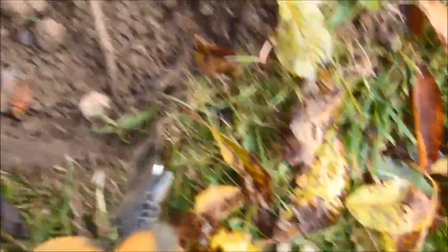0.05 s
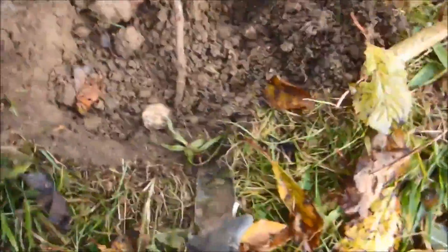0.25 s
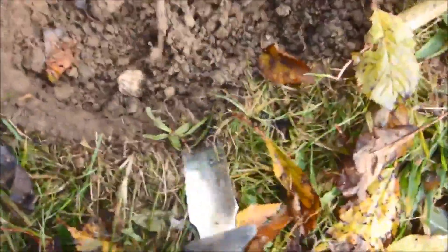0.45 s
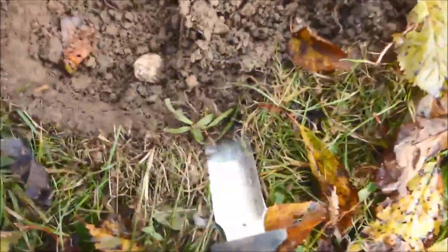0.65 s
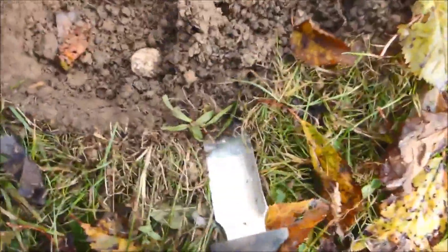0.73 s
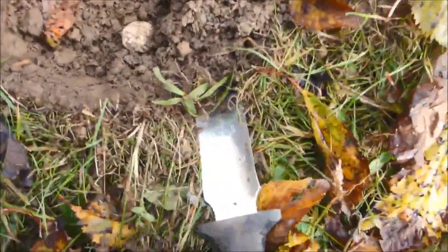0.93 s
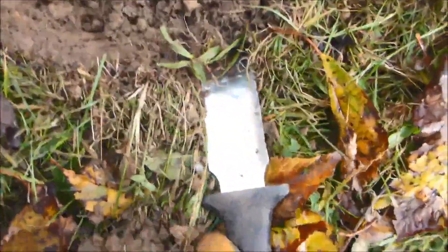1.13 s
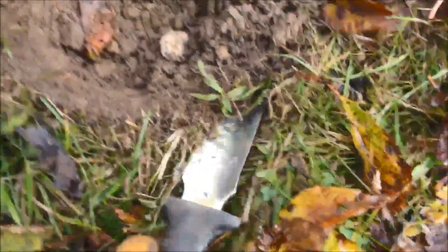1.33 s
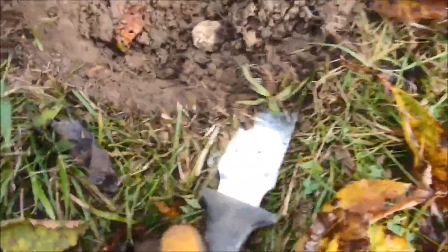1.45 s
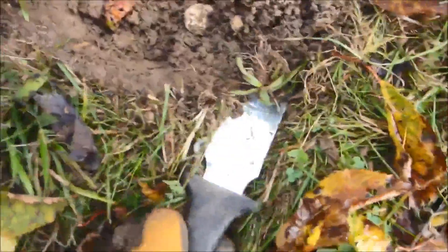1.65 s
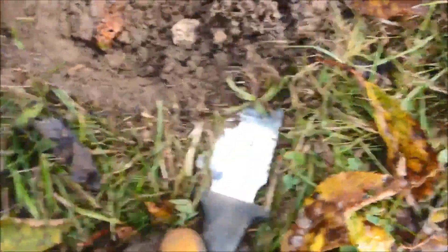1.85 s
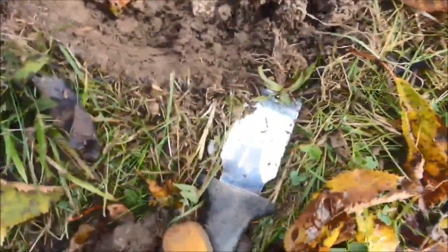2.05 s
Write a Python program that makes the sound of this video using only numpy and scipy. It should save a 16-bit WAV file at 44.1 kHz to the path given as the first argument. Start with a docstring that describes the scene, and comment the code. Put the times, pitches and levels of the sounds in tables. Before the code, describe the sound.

A steel digging knife knocks and clacks in soil amid softly rustling grass.

```python
"""A steel digging knife works through grass and dry leaves at the edge of a hole, close up.
One dull knock in the soil with a gritty scrape, then two sharp clacks of the damped steel, the second
with a thud under it, then light ticks of stems and crumbs. Grass rustles and swishes over the moving
blade, and handling friction adds a hollow rubbing tone and brief squeaks.
A thin ring flutters on the right, over a bed of quiet outdoor air."""
import sys
import numpy as np
from scipy import signal
from scipy.fft import rfft, irfft
from scipy.io import wavfile
from scipy.ndimage import map_coordinates

SR = 44100
rng = np.random.default_rng(int(sys.argv[2]) if len(sys.argv) > 2 else 0)


def master_out(mix):
    """Clip the mix to full scale and print it as 16-bit PCM to the path in sys.argv[1]."""
    frames = np.transpose(np.atleast_2d(mix))
    ceiling = np.clip(frames, -1, 1)
    pcm = np.round(ceiling * 32767).astype(np.int16)
    wavfile.write(sys.argv[1], SR, pcm)


N = 92610
T = np.arange(N) / SR
FREQS = np.fft.rfftfreq(N, 1 / SR) + 1e-3

# EQ of the air bed, mid and side: f/Hz, gain/dB
AIR_MID_EQ = [(25, -5.5), (70, -4.5), (150, 2.5), (300, 4), (800, 4), (1400, 2.5), (1800, 8), (2500, -6),
              (4000, -20.5), (6000, -3), (7800, -5.5), (10000, -20.5), (13000, -25), (15000, -20)]
AIR_SIDE_EQ = [(25, -14), (150, -7.5), (700, 2.5), (1600, 4.5), (2150, 13.5), (2900, -6), (7500, -8),
               (10000, -26.5), (15000, -27)]
# swells of the thin ring: centre t/s, length/s, level before trim/dB
THIN_RING_SWELLS = [(0.027, 0.074, -47.5), (0.13, 0.08, -47.5), (0.207, 0.051, -50), (0.29, 0.043, -46.5),
                    (0.338, 0.048, -48.5), (0.42, 0.032, -40.5), (.475, .05, -45), (0.701, 0.037, -41.5),
                    (0.771, 0.022, -44), (0.839, 0.02, -49), (0.891, 0.039, -48), (0.99, 0.018, -45.5),
                    (1.1, .05, -50), (1.256, 0.034, -43.5), (1.336, 0.038, -44), (1.41, 0.085, -54),
                    (1.584, 0.061, -44.5), (1.697, 0.089, -47.5), (1.82, 0.026, -43.5), (1.915, 0.075, -40),
                    (2.014, 0.044, -44.5), (2.078, 0.024, -44)]
# envelope of the hollow rub: t/s, level/dB
RUB_ENVELOPE = [(0, -60), (.15, -53.5), (.33, -49), (.48, -54.5), (.54, -65), (.6, -82), (.67, -55),
                (.86, -58.5), (1.02, -66), (1.19, -59.5), (1.29, -70), (1.42, -55), (1.53, -53),
                (1.59, -53), (1.7, -53.5), (1.76, -68.5), (1.84, -84), (1.88, -56.5), (1.935, -59),
                (1.96, -58), (2.1, -53.5)]
# handling squeaks: centre t/s, length/s, level/dB, f/Hz, glide/(octaves per s)
SQUEAK_CUES = [(1.528, .05, -50.5, 598.6, 7), (1.566, 0.019, -59, 1024, 19), (1.621, 0.021, -53, 1570, 1.5),
               (1.931, 0.011, -47.5, 687, -2), (1.982, 0.0094, -46.5, 704, -1.5)]
# envelope of the grass rustle: t/s, level/dB
RUSTLE_ENVELOPE = [(0, -53), (.09, -50.5), (.13, -48), (.19, -51.5), (.28, -50.5), (.44, -54), (.54, -58),
                   (.63, -64.5), (.68, -61.5), (.78, -58), (.88, -67), (1.0, -60), (1.15, -66), (1.21, -55),
                   (1.275, -66), (1.36, -56), (1.41, -51), (1.5, -53.5), (1.565, -47), (1.61, -54.5),
                   (1.69, -56.5), (1.77, -62), (1.83, -56.5), (1.94, -51), (2.02, -58.5), (2.1, -55)]
# EQ of the rustle, mid and side: f/Hz, gain/dB
RUSTLE_MID_EQ = [(40, -30), (90, -14), (170, -4), (280, 5), (420, 3), (800, 10), (1300, 2.5), (1800, 3),
                 (2600, 1.5), (5000, -2), (6800, -8), (8500, -17.5), (10500, -29.5), (13200, -37),
                 (14800, -20.5), (16000, -50)]
RUSTLE_SIDE_EQ = [(40, -60), (200, -16), (800, -13), (1500, -17), (2150, 1), (2900, -5), (5000, -7.5),
                  (7000, -11.5), (10000, -82), (15000, -50)]
# swishes of grass along the blade: centre t/s, length/s, level/dB
SWISH_CUES = [(0.133, 0.03, -54.5), (1.442, 0.049, -49.5), (1.563, 0.03, -51), (1.637, 0.0052, -56)]
# EQ of a swish: f/Hz, gain/dB
SWISH_EQ = [(500, -18), (1500, -4), (2600, -1), (5500, 0.5), (7500, -17), (10500, -34), (13000, -39),
            (14600, -17), (16000, -30)]
# envelope of the blade dragging along the ground: t/s, level/dB
SCRAPE_ENVELOPE = [(1.33, -79), (1.43, -50), (1.58, -54), (1.68, -57.5), (1.77, -73)]
# resonances of the dragged blade: f/Hz, width/Hz, relative level/dB
SCRAPE_RESONANCES = [(1807, 240, -13.5), (3744, 220, -12), (5250, 240, -12)]
# stems and crumbs snapping: t/s, level before EQ/dB, pan left/dB, relative tail level/dB, tail t60/s
TICK_CUES = [(.7683, -37, 6, -11, .007), (.788, -33.5, .5, -11, .007), (.8296, -33, 0, -11, .007),
             (.9555, -41, 0, -11, .007), (1.074, -39, 0, -11, .007), (1.1708, -27, 3, -11, .007),
             (1.421, -34, 1, -11, .007), (1.637, -38, .5, -7, .03), (1.64, -33, .5, -9, .012),
             (1.715, -41, 7, -9, .012)]
# EQ of a tick: f/Hz, gain/dB
TICK_EQ = [(150, -33), (600, -14), (2000, -7), (3000, -10), (4200, 0), (7000, 1), (9000, -7), (11000, -19),
           (16000, -16)]
# grit hitting the blade: t/s, level/dB, pitch/ratio to the grit's modes
GRIT_CUES = [(.2393, -42, 1.05), (.2422, -34, .96), (.2443, -36.5, .86), (0.2504, -32.5, 1),
             (.2553, -33.5, 1.08)]
# modes of the grit: f/Hz, relative level/dB, t60/s
GRIT_RESONANCES = [(2250, -6, 0.0074), (3350, -6, 0.0052), (4400, -4, 0.0032), (4980, -3, 0.0079)]
# dull blows into the soil, and the dull body under some clacks and ticks: t/s, level/dB, f/Hz, t60/s, attack/s
THUD_CUES = [(0.0825, -39, 211, 0.012, 0.00065), (.2441, -12.5, 625, 0.011, 0.0023),
             (0.4779, -38.5, 415, 0.023, .0006), (0.5123, -25, 860, 0.0062, 0.00052),
             (0.5127, -23.5, 320, 0.012, 0.00056), (.8292, -33.5, 1120, 0.004, 0.00021),
             (1.171, -34, 620, 0.0092, .001), (1.302, -30, 1040, 0.004, 0.00045),
             (1.389, -44, 178, 0.033, .004)]
# the edge skidding just before each clack: t/s, level before EQ/dB, t60/s
SKID_CUES = [(.4771, -26, .002), (.5112, -24, .009)]
# EQ of a skid: f/Hz, gain/dB
SKID_EQ = [(1500, -25), (3000, -4), (5000, -9), (7000, 2), (8800, -2), (10500, -12), (12200, -6),
           (15500, -5)]
# hard hits on the knife: t/s, level/dB, tilt/(dB per octave), pan left/dB, decay/ratio to the modes' t60
CLACK_CUES = [(.4773, -10.5, -5, 2, .66), (.51145, -16.5, 1, 7, .7), (.5127, -.2, 1, 0, 1.05)]
# modes of the struck knife: f/Hz, relative level/dB, t60/s, pan left/dB
KNIFE_MODES = [(2750, -25, .0083, 4.5), (3110, -22.3, .0032, -21), (3960, -25, .005, -2),
               (5490, -20.7, .007, 2), (5930, -13.7, .0048, 0), (6420, -18.6, .0031, 15),
               (8160, -29.6, .003, 16), (12390, -33.6, .0011, 7)]


def undb(db):
    """Decibels to gain."""
    return 10 ** (np.asarray(db) / 20)


def unit(x):
    """Scale to rms 1."""
    return x / np.sqrt(np.mean(x ** 2))


def envelope(rows):
    """Gain over time through t/s, level/dB points."""
    return undb(np.interp(T, *np.array(rows).T))


def swell(centre, length, db):
    """Bell-shaped fade in and out, peaking at db."""
    return undb(db) * np.exp(-(2 * (T - centre) / length) ** 2)


def fade(start, t60):
    """Exponential decay from a start time."""
    return (T >= start) * undb(-60 * np.maximum(T - start, 0) / t60)


def eq(x, rows):
    """Filter through f/Hz, gain/dB points."""
    hz, db = np.array(rows).T
    return irfft(rfft(x) * undb(np.interp(np.log(FREQS), np.log(hz), db)), N)


def cut(x, hz, kind, order):
    """High-pass or low-pass."""
    return signal.sosfilt(signal.butter(order, hz, kind, fs=SR, output="sos"), x)


def resonate(x, hz, width_hz):
    """A steep resonance: one band-pass applied twice."""
    return irfft(rfft(x) / (1 + 1j * hz / width_hz * (FREQS / hz - hz / FREQS)) ** 2, N)


def noise():
    """White noise."""
    return rng.standard_normal(N)


def wobble(rate_hz):
    """Smooth random modulation at rms 1, rolling off above rate_hz."""
    return unit(irfft(rfft(noise()) * np.exp(-(FREQS / rate_hz) ** 2), N))


def ring(start, hz, t60):
    """One struck mode."""
    start = np.round(start * SR) / SR
    return fade(start, t60) * np.sin(2 * np.pi * hz * (T - start))


def pan(x, left_db):
    """Place a sound by its left minus right level."""
    return x * undb(np.array([[left_db], [-left_db]]) / 2)


def widen(mid, side):
    """Mid and side to left and right, at rms 1."""
    return unit(np.array([mid + side, mid - side]))


def air(level_db=-58):
    """A steady, wide bed of quiet outdoor air."""
    return undb(level_db) * widen(eq(noise(), AIR_MID_EQ), eq(noise(), AIR_SIDE_EQ))


def thin_ring(hz=1165.5, wander_hz=14.2, trim_db=-1.5, bed_db=-62, left_db=-9.5):
    """A narrow, unsteady ring swells and sinks on the right, faint and phase-flipped on the left."""
    swells = undb(trim_db) * sum(swell(*cue) for cue in THIN_RING_SWELLS)
    pitch = hz + wander_hz * wobble(61)
    tone = unit(np.sin(2 * np.pi * np.cumsum(pitch) / SR))
    bed = undb(bed_db) * unit(resonate(noise(), hz, width_hz=113))
    return (swells * tone + bed) * np.array([[-undb(left_db)], [1]])


def rub(pitch_wander=.04):
    """Handling friction sounds through one hollow resonance that shifts with the grip."""
    drift = np.cumsum(pitch_wander * wobble(7.95))
    hollow = resonate(noise(), hz=645, width_hz=190)
    shifting = map_coordinates(hollow, [np.arange(N) + drift], mode="mirror")  # varispeed
    return unit(shifting) * envelope(RUB_ENVELOPE)


def squeaks(waver_depth=.0256):
    """Friction catches for a moment and gives a wavering note that glides up or down."""
    out = np.zeros(N)
    waver = 1 + waver_depth * wobble(150)
    for centre, length, db, hz, glide in SQUEAK_CUES:
        pitch = hz * waver * 2 ** (glide * np.clip(T - centre, -length, length))
        out += swell(centre, length, db) * unit(np.sin(2 * np.pi * np.cumsum(pitch) / SR))
    return out


def grass_friction(grains_per_s=2200, grain_share=.35):
    """The raw texture of sliding grass: hiss mixed with dense tiny grains."""
    hiss = noise()
    grains = unit(noise() * (rng.random(N) < grains_per_s / SR))
    return np.sqrt(1 - grain_share) * hiss + np.sqrt(grain_share) * grains


def rustle(crossover_hz=1900, flicker_db=1.5):
    """Grass slides over the knife; the level flickers and the treble sits a little to the left."""
    grass = widen(eq(grass_friction(), RUSTLE_MID_EQ), eq(grass_friction(), RUSTLE_SIDE_EQ))
    treble = irfft(rfft(grass) * FREQS ** 2 / (FREQS ** 2 + crossover_hz ** 2), N)
    flicker = undb(flicker_db * wobble(33))
    return (grass - treble + pan(treble, left_db=1.5)) * envelope(RUSTLE_ENVELOPE) * flicker


def swishes(side_db=-9.5):
    """Short, bright swishes as grass sweeps along the steel, a little to the left."""
    swells = sum(swell(*cue) for cue in SWISH_CUES)
    hiss = widen(eq(noise(), SWISH_EQ), undb(side_db) * eq(noise(), SWISH_EQ))
    return pan(hiss * swells, left_db=4.5)


def scrape():
    """Grass and grit faintly ring the blade as it is drawn along."""
    blade = sum(undb(db) * unit(resonate(noise(), hz, width)) for hz, width, db in SCRAPE_RESONANCES)
    return blade * envelope(SCRAPE_ENVELOPE)


def ticks():
    """Stems and crumbs give way: each a tiny crack with a short crumbling tail."""
    out = np.zeros((2, N))
    for start, db, pan_db, tail_db, t60 in TICK_CUES:
        crack = undb(tail_db) * noise() * fade(start, t60)
        crack[int(start * SR)] += 1
        out += pan(undb(db) * eq(crack, TICK_EQ), pan_db)
    return out


def grit():
    """Grit scrapes the blade around the dull knock: a quick run of blunt hits, each at its own pitch."""
    hits = sum(undb(db + mode_db) * ring(start, hz * pitch, t60)
               for start, db, pitch in GRIT_CUES for hz, mode_db, t60 in GRIT_RESONANCES)
    return cut(hits, hz=6460, kind="low", order=6)


def thuds():
    """Soft blows into the soil, and the dull body under some clacks and ticks: a few heavily damped cycles
    each, with no deep bass."""
    blows = np.zeros(N)
    for start, db, hz, t60, attack in THUD_CUES:
        fade_in = 1 - np.exp(-np.maximum(T - start, 0) / attack)
        blows += undb(db) * ring(start, hz, t60) * fade_in
    return cut(blows, hz=127, kind="high", order=4)


def skids():
    """The edge slips for an instant before each clack: a bright scratch on the left."""
    bursts = sum(undb(db) * fade(start, t60) for start, db, t60 in SKID_CUES)
    return pan(bursts * eq(noise(), SKID_EQ), left_db=10)


def clacks(tilt_pivot_hz=5500, tail_db=-21):
    """Hard hits ring the heavily damped steel; the ground scatters a faint tail."""
    steel = np.zeros((2, N))
    for start, db, tilt, pan_db, decay in CLACK_CUES:
        for hz, mode_db, t60, mode_pan_db in KNIFE_MODES:
            gain = undb(db + mode_db + tilt * np.log2(hz / tilt_pivot_hz))
            steel += pan(gain * ring(start, hz, t60 * decay), pan_db + mode_pan_db)
    steel = cut(steel, hz=2420, kind="high", order=8)
    steel = cut(steel, hz=8600, kind="low", order=3)
    scatter = unit(np.array([noise(), noise()]) * fade(0, t60=.012)) / np.sqrt(N)
    tail = irfft(rfft(steel) * rfft(scatter), N)
    return steel + undb(tail_db) * tail


def scene():
    """The full mix in the open air, with no room reverb."""
    hits = clacks() + skids() + thuds() + grit() + ticks()
    textures = rustle() + swishes() + rub() + thin_ring() + air() + scrape() + squeaks()
    return hits + textures


def record(dry, top_hz=16300):
    """A steep high cut on the master."""
    return signal.sosfilt(signal.ellip(8, .2, 70, top_hz, fs=SR, output="sos"), dry)


dry = scene()
out = record(dry)
master_out(out)
```